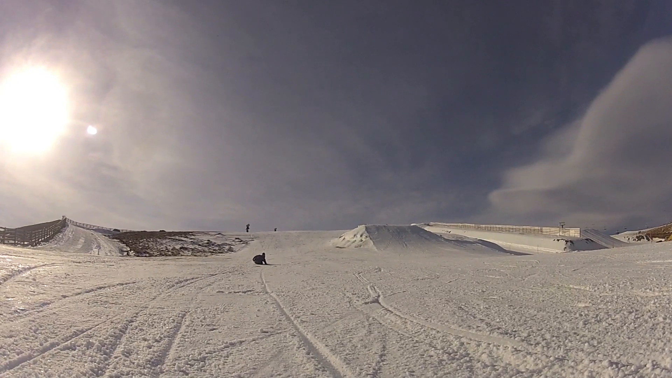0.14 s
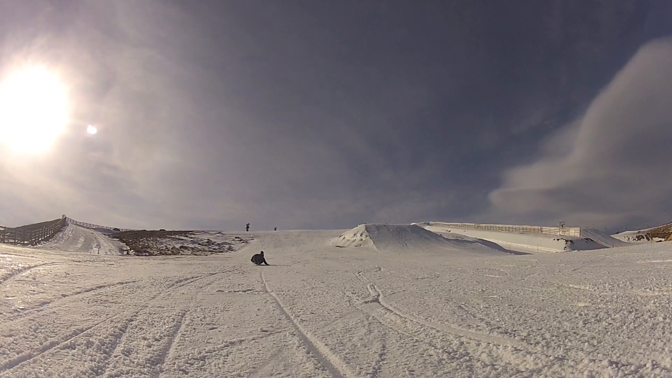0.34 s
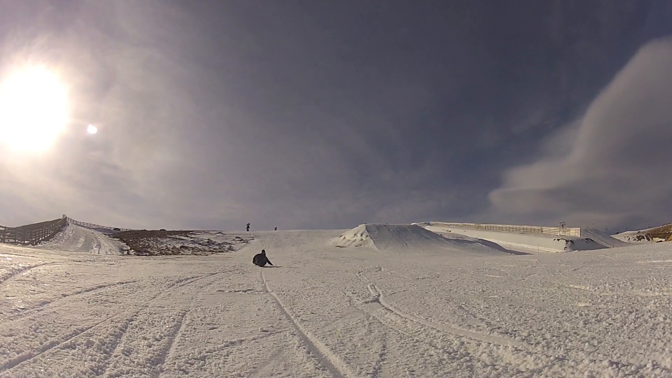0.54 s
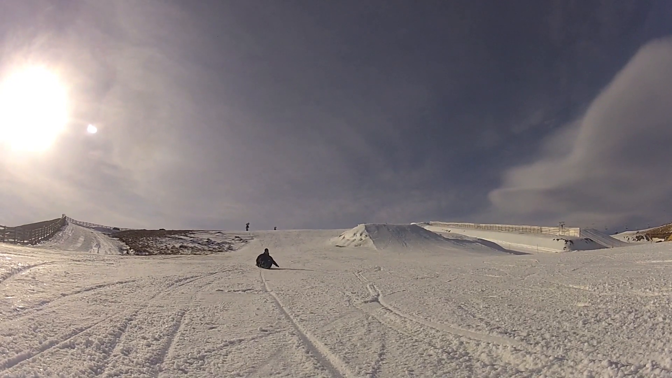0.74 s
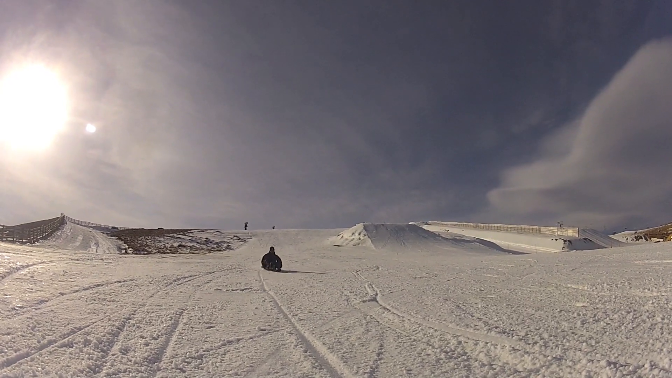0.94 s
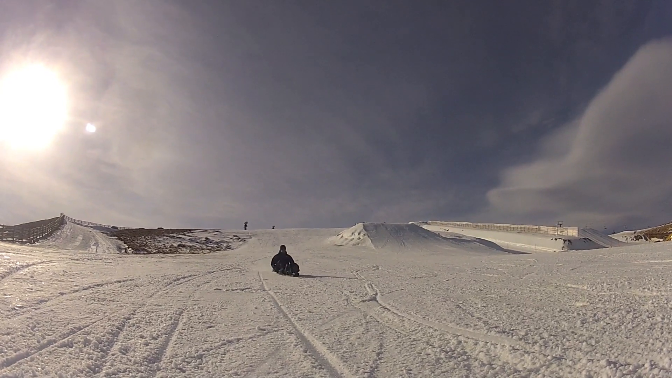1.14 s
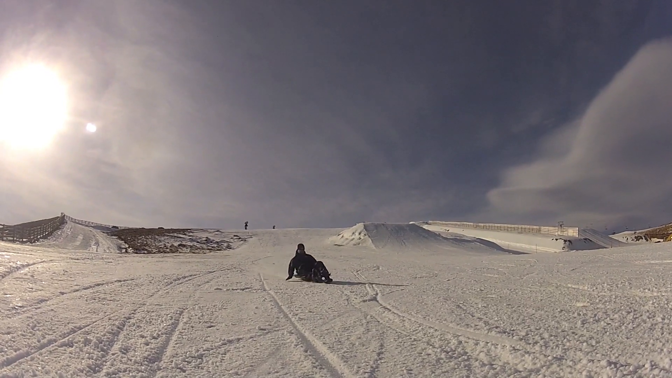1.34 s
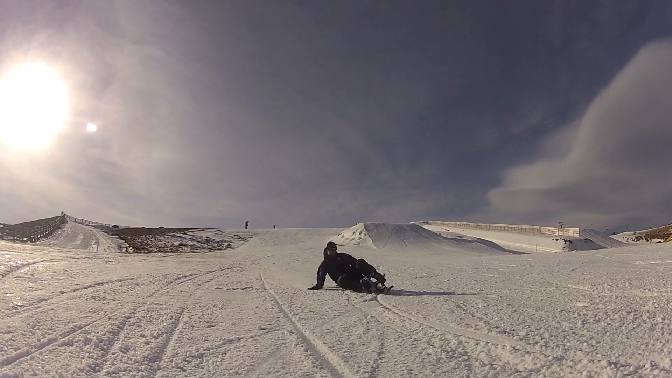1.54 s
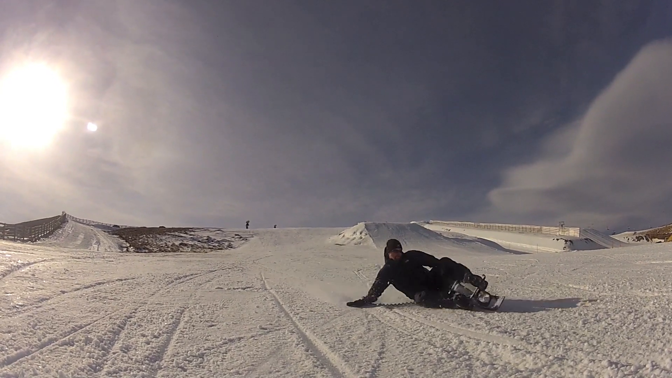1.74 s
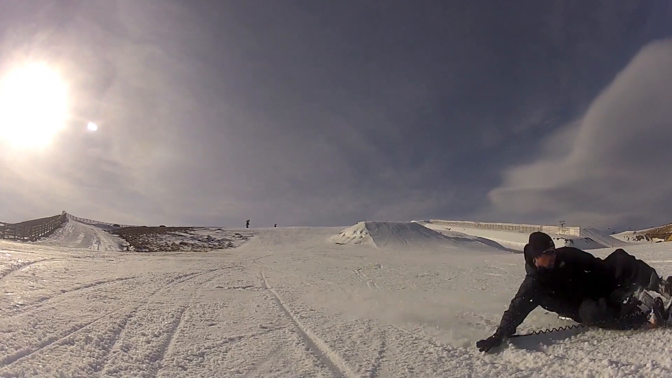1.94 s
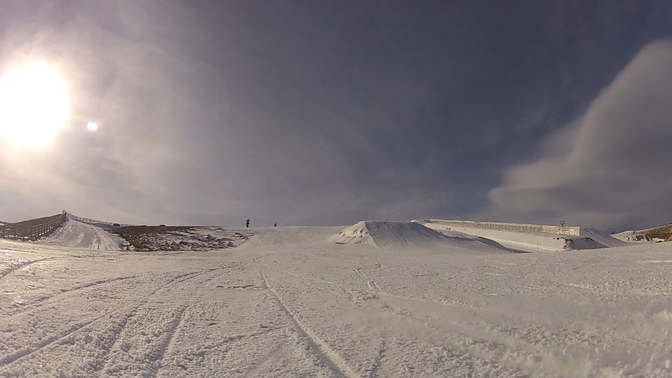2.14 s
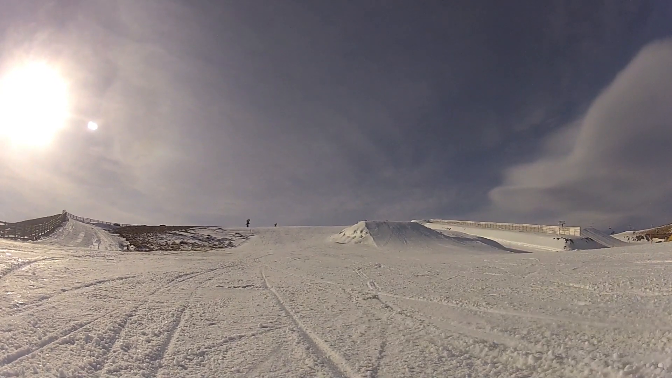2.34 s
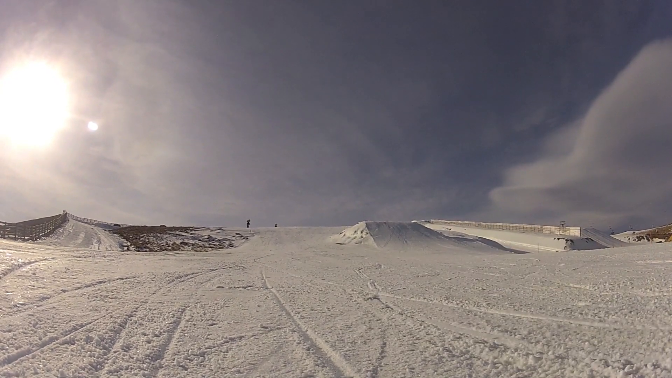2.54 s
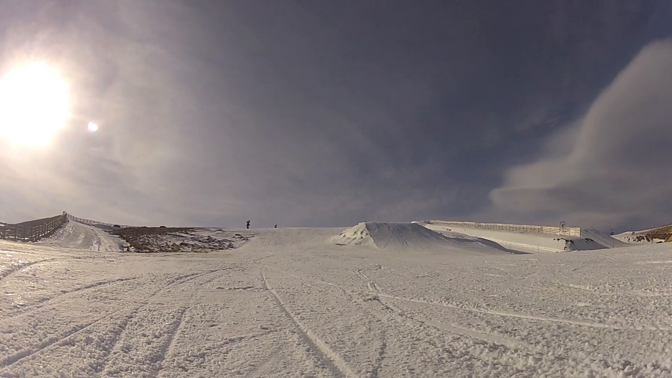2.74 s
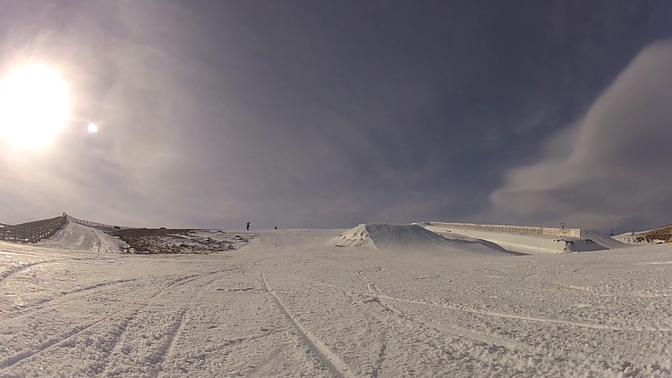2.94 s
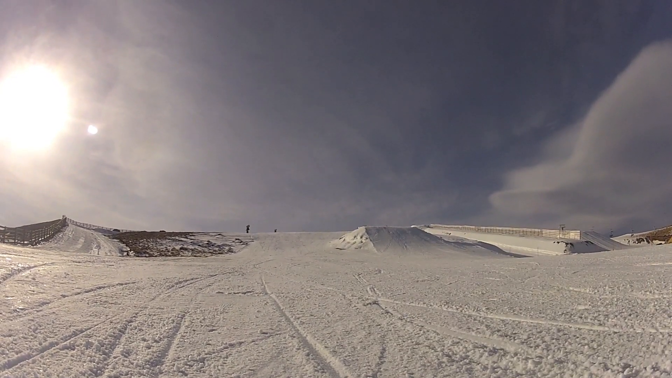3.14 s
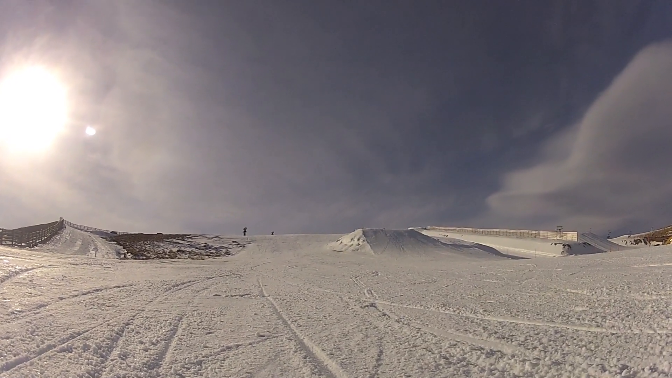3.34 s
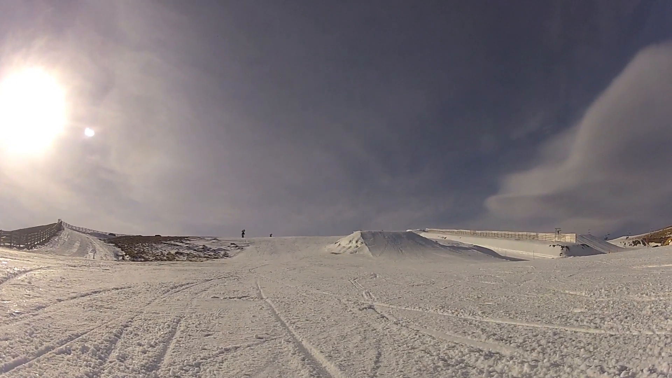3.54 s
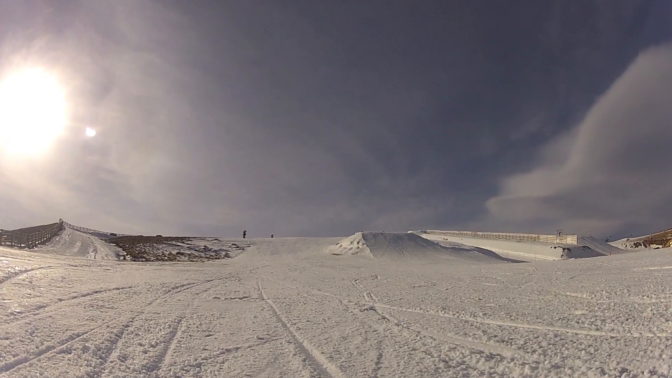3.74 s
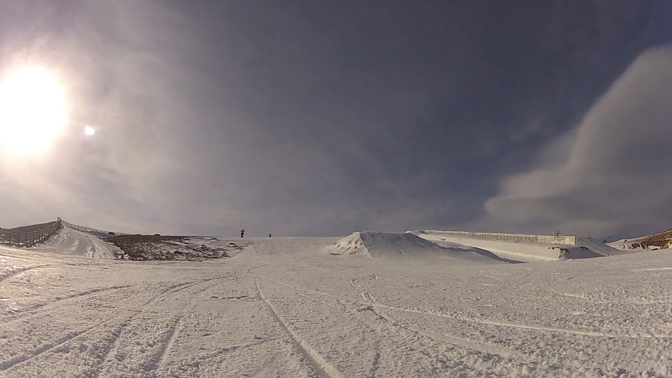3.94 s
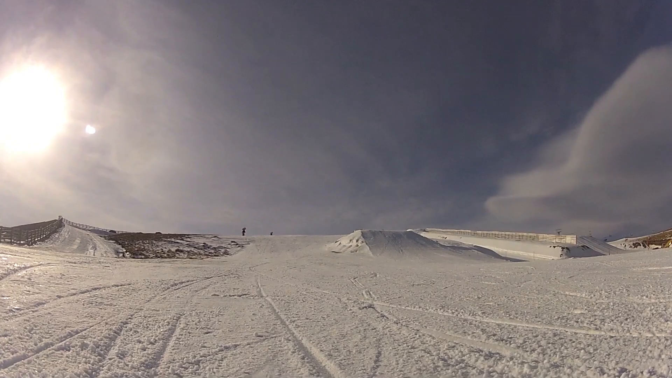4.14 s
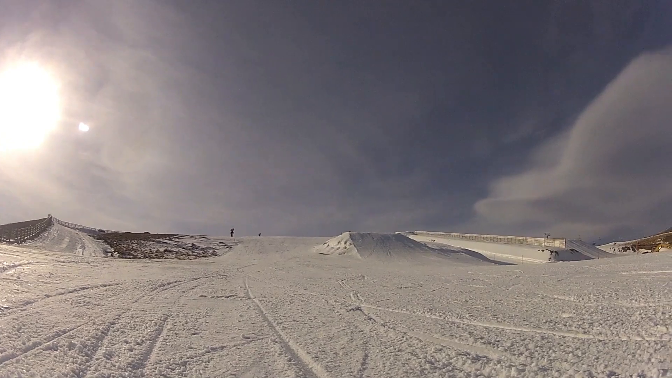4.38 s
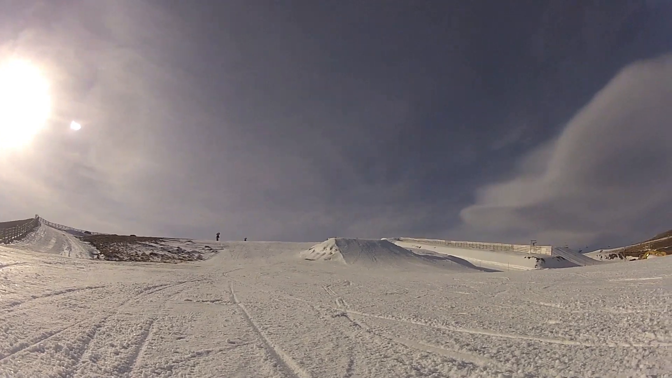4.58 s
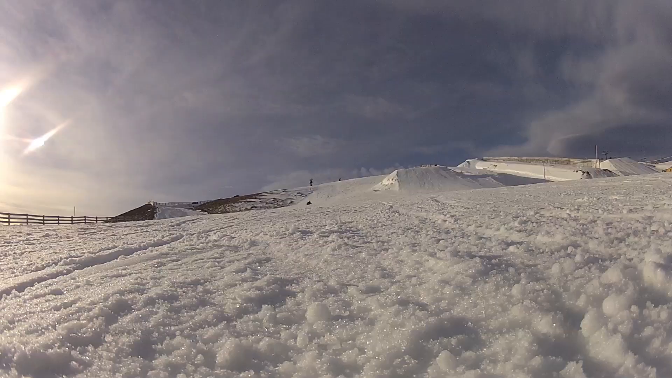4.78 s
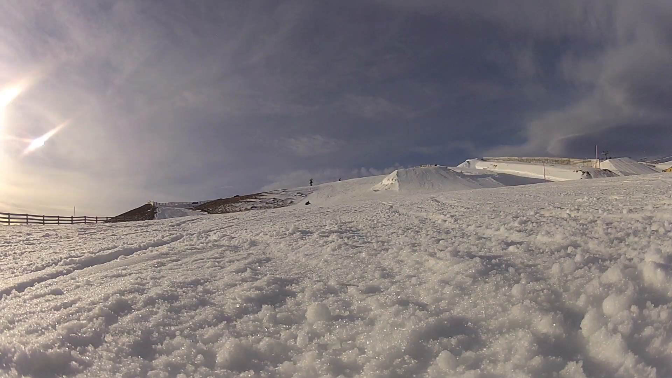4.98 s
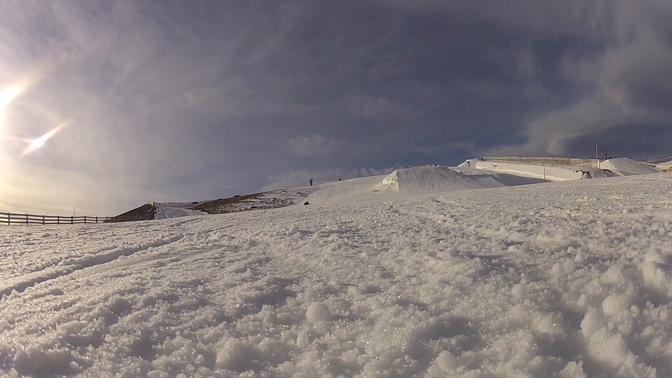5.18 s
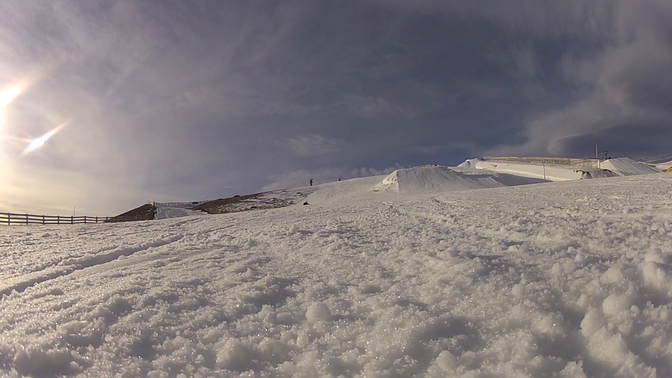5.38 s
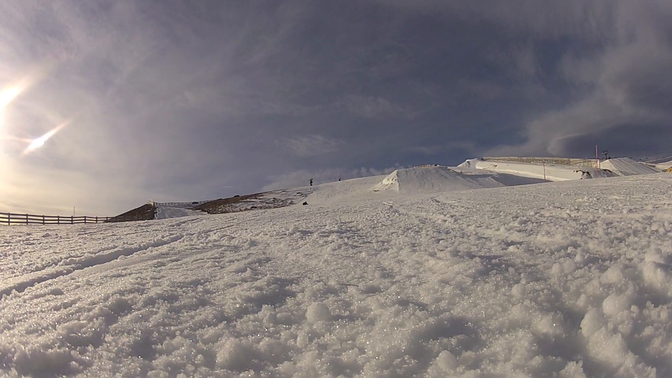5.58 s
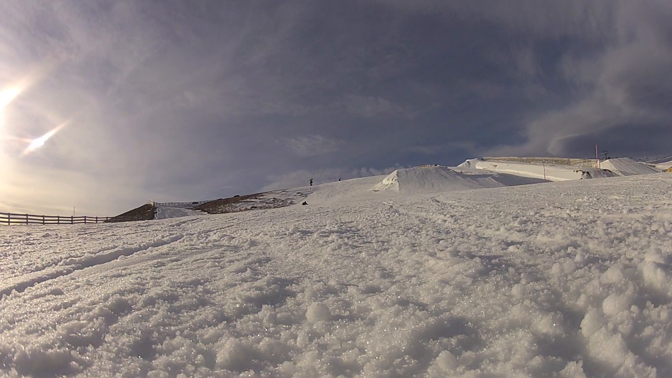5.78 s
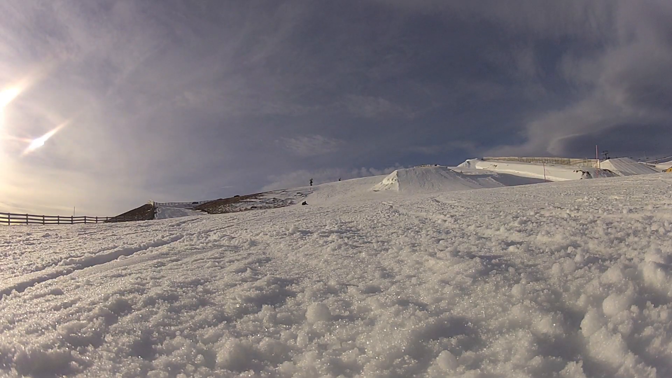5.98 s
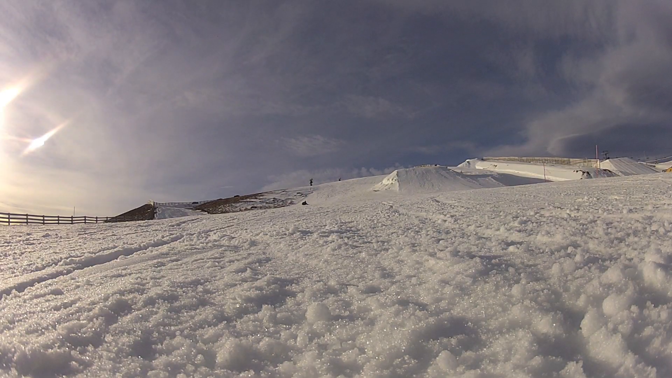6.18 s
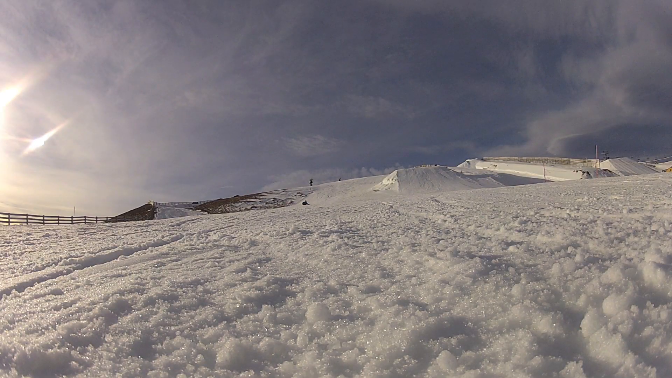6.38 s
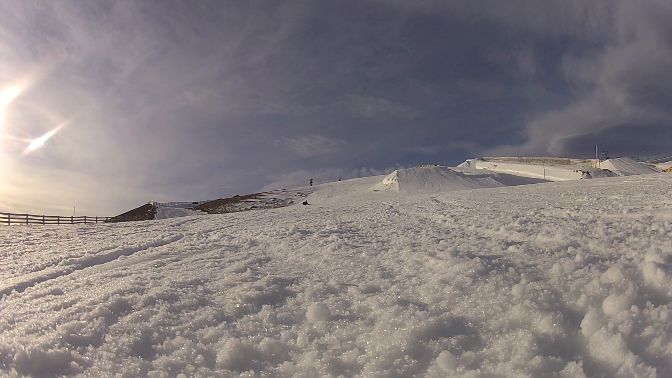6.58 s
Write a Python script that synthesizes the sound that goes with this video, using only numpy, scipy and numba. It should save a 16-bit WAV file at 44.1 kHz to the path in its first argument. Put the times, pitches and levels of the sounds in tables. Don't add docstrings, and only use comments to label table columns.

```python
import sys
import numpy as np
from scipy import signal
from scipy.fft import rfft, irfft
from scipy.io import wavfile
from scipy.ndimage import uniform_filter1d
from numba import njit

SR = 44100
rng = np.random.default_rng(int(sys.argv[2]) if len(sys.argv) > 2 else 0)


def rack_gain(trim_db):
    fader = np.asarray(trim_db, float)
    return 10 ** (fader / 20)


def bounce(signal):
    frames = np.transpose(np.atleast_2d(signal))
    limited = np.clip(frames, -1, 1)
    pcm = np.round(limited * 32767).astype(np.int16)
    wavfile.write(sys.argv[1], SR, pcm)


N = 291711
KNOCK_S, CUT_S = 4.76295, 4.7985

# time in seconds, rush level in dB, bite of the edge in dB (rings the scrape louder, higher).
SLIDE = [(0.0, -66, -3), (0.25, -60.5, -3), (0.7, -63.5, -4.5), (0.93, -68.5, -4.5), (1.08, -62.5, -3),
         (1.3, -68, -3), (1.45, -57, -2.5), (1.7, -52, 0), (1.86, -48, -2), (1.95, -43, 3.5),
         (2.13, -44.5, 3), (2.25, -51.5, 7), (2.4, -50.5, 3.5), (2.55, -62.5, 4), (2.8, -68, 10.5),
         (2.92, -72.5, 8.5), (3.3, -76, 11.5), (3.7, -91.5, 7)]
# start in seconds, peak in dB, hiss in dB, drone in dB.
LUMPS = [(0.151, -65, 8, -20), (0.172, -55.5, 11, -23), (0.195, -61, 11, -21), (0.837, -50, -8, -3),
         (0.997, -59.5, 14.5, -17), (1.272, -59, 8, -17), (1.355, -59, 15, -23), (1.382, -62, 14.5, -6),
         (1.428, -48, -1, -17), (1.475, -52, 10, -20), (1.495, -45.5, 6, -10), (1.589, -46, -16, 0),
         (1.612, -41.5, -14, -5), (1.679, -37.5, -5, -8), (1.711, -40, -3, -20), (1.767, -39, -2, -25),
         (1.797, -54, -8, -23), (1.834, -44, 10, -20), (1.934, -33, -12, -2), (1.98, -41, -18, -8),
         (2.02, -37, -13, -9), (2.115, -23.5, -12, -10), (2.178, -28, -24, -22), (2.184, -21.5, -32, -28),
         (2.218, -35.5, -22, 1), (2.357, -39, -4, -5), (2.457, -34.5, -13, -22), (2.601, -32.5, -31, -18),
         (2.706, -34.5, -36, -13.5), (3.191, -42, -21, -24)]
# centre in Hz, width in Hz, level in dB.
CASE_MODES = [(2644, 20, -8), (3066, 147, -5), (3754, 200, -4.5), (4590, 69, -14), (4860, 420, -20.5)]
# centre in Hz, width in Hz, level in dB.
HULL_MODES = [(531, 376, 1.5), (964, 260, 6), (1280, 550, 4)]
# centre in Hz, width in Hz, level in dB.
BOOM_MODES = [(124, 110, -5), (238, 122, -0.5), (318, 93, -2)]
# time in seconds, level in dB.
WIND_LEVEL = [(0, -53.5), (1.6, -55.5), (3.6, -55), (4.1, -59), (4.8, -60), (4.87, -61), (6.6, -62)]
# frequency in Hz, density in dB per Hz.
WIND_COLOUR = [(12, -25.5), (20, -4.5), (40, 0), (65, -6.5), (97, -0.5), (205, -7.5), (232, -6.5),
               (393, -13.5), (433, -18.5), (900, -31.5), (1170, -62.5), (1980, -120)]
# frequency in Hz, density in dB per Hz.
HISS_COLOUR = [(290, -35.5), (500, -3), (628, -9.5), (689, -7.5), (1400, -9.5), (1620, -9), (1910, -9),
               (4650, -14), (5900, -18.5), (7670, -54.5), (13000, -120)]
# frequency in Hz, density in dB per Hz.
RUB_COLOUR = [(240, -30.5), (400, 9.5), (860, -20.5), (1100, -1.5), (1440, -9.5), (2000, -1.5), (2810, -11),
              (3600, -10), (5210, -25), (5900, -29), (7670, -65), (13000, -120)]
# centre in Hz, width in Hz, level in dB.
RUMBLE_MODES = [(140, 150, 0)]
# start in seconds, peak in dB, pitch in Hz.
TICKS = [
    (4.615, -51, 1100),
    (4.655, -39.5, 1100),
    (4.689, -43, 1150),
    (4.717, -37.5, 1950),
    (4.726, -41.5, 1950),
    (4.735, -33, 1900),
    (4.744, -34, 1950),
]
# start in seconds, peak in dB, pitch in Hz, 60 dB decay in seconds.
THUDS = [
    (3.805, -37, 102, 0.063),
    (4.55, -36, 111, 0.042),
    (4.594, -38, 110, 0.06),
    (4.6179, -28, 58.5, 0.13),
    (4.689, -43, 196.3, 0.032),
    (4.744, -22, 150, 0.04),
]
# pitch in Hz, peak in dB.
SHELL_RATTLE = [(1190, -2), (1660, -13), (2240, -14.5), (2850, -20), (3520, -10.5), (4100, -19),
                (4850, -23)]


def seconds():
    return np.arange(N) / SR


def unit(x):
    return x / np.sqrt(np.mean(x ** 2))


def noise():
    return rng.standard_normal(N)


def columns(table):
    s, *cols = np.transpose(table)
    return [np.interp(seconds(), s, c) for c in cols]


@njit
def svf(x, hz, width):
    y, band, low = np.empty(len(x)), 0., 0.
    for i in range(len(x)):
        g = np.tan(np.pi * hz[i] / SR)
        damping = width / hz[i]
        v = (band + g * (x[i] - low)) / (1 + g * (g + damping))
        band = 2 * v - band
        low = low + 2 * g * v
        y[i] = damping * v
    return y


def modes(x, table):
    out = np.zeros(N)
    for k, (hz, width, db) in enumerate(table):
        out += (-1) ** k * rack_gain(db) * svf(x, np.full(N, 1. * hz), 1. * width)
    return out


def colour(x, table):
    hz, db = np.transpose(table)
    log_f = np.log(np.fft.rfftfreq(N, 1 / SR) + 1)
    gain = rack_gain(np.interp(log_f, np.log(hz), db, left=-90))
    return unit(irfft(rfft(x) * gain, N))


def walk(rate):
    hold = int(SR / rate)
    steps = np.repeat(rng.standard_normal(N // hold + 1), hold)
    return unit(uniform_filter1d(uniform_filter1d(steps, hold), hold)[:N])


def crystals(per_s, scatter_db, smooth_db):
    when, sign, luck = rng.random((3, N))
    size = rack_gain(-scatter_db * np.log(luck + .03))
    cracks = (when < per_s / SR) * np.sign(sign - .5) * size
    return unit(unit(cracks) + rack_gain(smooth_db) * noise())


def bursts(starts, dbs, lengths):
    env = np.zeros(N)
    t = np.arange(int(.08 * SR)) / SR
    for s, db, length in zip(starts, dbs, lengths):
        i = int(s * SR)
        env[i:i + len(t)] += rack_gain(db) * (1 - np.exp(-t / .0005)) * np.exp(-t / max(length, .001))
    return env


def ring(s, db, hz, t60):
    t = np.maximum(seconds() - s, 0)
    return rack_gain(db) * np.sin(2 * np.pi * hz * t) * np.exp(-np.log(1000) * t / t60)


def sled():
    level_db, bite_db = columns(SLIDE)
    level = rack_gain(level_db) * np.clip((SLIDE[-1][0] - seconds()) / 0.15, 0, 1)
    behind = .5 + .5 * np.tanh((seconds() - 2.204) / 0.14)
    gone = .5 + .5 * np.tanh((seconds() - 2.37) / .04)

    def blend(ahead, past):
        return ahead + (past - ahead) * behind

    shared_db = .7 * walk(14) + 1.2 * walk(110)
    stutter, crackle, shudder = (unit(rack_gain(shared_db + 1.9 * walk(90))) for _ in range(3))
    grains = crystals(per_s=2500, scatter_db=2.8, smooth_db=0)

    # two scrape rings and a broad skirt, pitch rising 49 Hz per dB of bite
    scrape_hz = (2254 + 49 * bite_db) * (1 - gone) + 2430 * gone
    upper_ring = rack_gain(-6 * gone) * svf(grains, scrape_hz, 240.0)
    lower_ring = 1.07 * svf(grains, 0.755 * scrape_hz, 274.0)
    scrape = unit(upper_ring - lower_ring)
    scrape_skirt = 0.066 * svf(grains, scrape_hz, 1130.0)
    scrape = unit(unit_scale(upper_ring - lower_ring, scrape, scrape_skirt))

    hiss = unit(modes(grains, CASE_MODES) + 0.11 * svf(grains, np.full(N, 4500.), 3600.0))
    wake = rack_gain(-4) * unit(modes(grains, [(3750, 250., 0)]))
    spray = unit(svf(grains, blend(5300, 5200), 430.0))
    spray_db = -6.5 - .5 * (level_db + 69) - 12 * behind
    hiss = hiss * rack_gain(-4 * behind) + behind * wake + spray * rack_gain(spray_db)

    tail = rack_gain(-1) * unit(modes(grains, [(1010, 300., 0)]))
    drone = unit(modes(grains, HULL_MODES)) - behind * tail
    boom = unit(modes(modes(noise(), BOOM_MODES), BOOM_MODES)) * rack_gain(2.0 * walk(28))

    s, db, lump_hiss_db, lump_drone_db = np.transpose(LUMPS)
    length = np.full(len(s), 0.0047)
    out = scrape * (level * stutter * rack_gain(bite_db - 3) + bursts(s, db - 12, length))
    out += drone * (level * shudder * rack_gain(blend(-3.5, -0.5)) + bursts(s, db + lump_drone_db - 6, length))
    echo_ms = blend(0.44, 0.31)
    out += 0.45 * np.interp(seconds() - echo_ms / 1000, seconds(), out)
    out += hiss * (level * crackle * rack_gain(-1) + bursts(s, db + lump_hiss_db - 7, length))
    return out + boom * level * rack_gain(blend(-3, -1.5) + 0.41 * bite_db)


def unit_scale(rings, scaled_rings, skirt):
    return scaled_rings + skirt


def wind():
    level_db, = columns(WIND_LEVEL)
    steady = colour(noise(), WIND_COLOUR)
    eddies = colour(noise(), WIND_COLOUR) * rack_gain(2.5 * walk(25))
    buried = unit(modes(noise(), [(330, 250., 0)])) * (seconds() > CUT_S)
    return rack_gain(level_db) * (unit(steady + eddies) + rack_gain(-8) * buried)


def electronics():
    return rack_gain(-70.5) * colour(noise(), HISS_COLOUR)


def fumble():
    before = KNOCK_S - seconds()
    scrape_db = np.where(before > 0, -48 - 120 * before, -52.5)
    rumble_db = np.where(before > 0, -48 - 25 * before, -42.5)
    held = np.clip((seconds() - 4.25) / .1, 0, 1) * (seconds() < CUT_S + .03)
    rub = colour(crystals(per_s=2000, scatter_db=2.5, smooth_db=0), RUB_COLOUR)
    rumble = unit(modes(modes(noise(), RUMBLE_MODES), RUMBLE_MODES))
    s, db, _ = np.transpose(TICKS)
    rub_level = held * rack_gain(scrape_db + 1.8 * walk(70)) + bursts(s, db - 9, np.full(len(s), .003))
    ticks = sum(ring(*row, t60=.014) for row in TICKS)
    thuds = sum(ring(*row) for row in THUDS)
    return rub * rub_level + ticks + held * rack_gain(rumble_db) * rumble + thuds


def knock():
    touch_s, let_go_s = .0039, 0.001
    t = seconds() - KNOCK_S
    touch = np.clip((touch_s - t) / let_go_s, 0, 1) * np.clip(t / .0002, 0, 1)
    shell = sum(rack_gain(db) * np.sin(2 * np.pi * hz * t) for hz, db in SHELL_RATTLE)
    push = rack_gain(-2) * np.sin(2 * np.pi * 280 * t) * t / touch_s
    grit = rack_gain(-20) * noise()
    first_tick = ring(KNOCK_S - .0009, db=-5.5, hz=2300, t60=.003)
    slump = ring(KNOCK_S + touch_s - let_go_s / 2, db=-7, hz=45, t60=.025)
    return touch * (shell - push + grit) + first_tick - slump


def scene():
    return (sled() + wind() + electronics() + fumble() + knock())[None]


def top_cut(x):
    return signal.sosfilt(signal.butter(12, 16480, fs=SR, output="sos"), x)


def record(dry):
    hold_hz, chip_hz, top_hz = 12000, 48000, 15400
    x = np.clip(dry, -.78, .78)
    x = signal.sosfilt(signal.butter(1, 28, "high", fs=SR, output="sos"), x)
    f = np.fft.rfftfreq(N, 1 / SR)
    x = irfft(rfft(x) * np.clip(0.14 + (hold_hz / 2 - f) / 600, 0, 1), N)
    x = x * (1 + 2 * np.cos(2 * np.pi * hold_hz * seconds()))
    hold_tilt = np.sinc(f / hold_hz) / np.sinc(f / chip_hz)
    top_edge = np.clip((top_hz - f) / 300, .02, 1) * (f < 16400)
    x = irfft(rfft(x) * hold_tilt * top_edge, N)
    t = seconds()
    remnant = .03 * np.exp(-(t - CUT_S) / .01) * (t < CUT_S + .03)
    gate = np.where(t < CUT_S, 1, remnant) + np.clip((t - 4.864) / 0.096, 0, 1)
    return top_cut(x * gate)


dry = scene()
out = record(dry)
bounce(out)
```